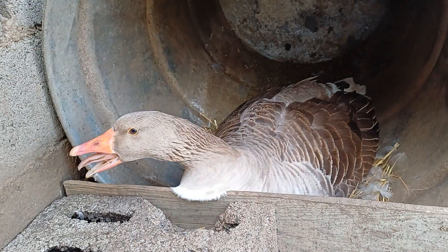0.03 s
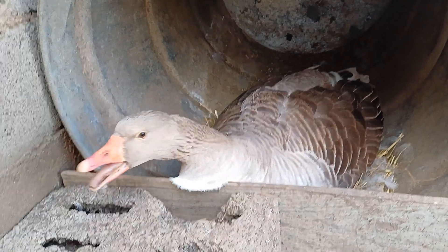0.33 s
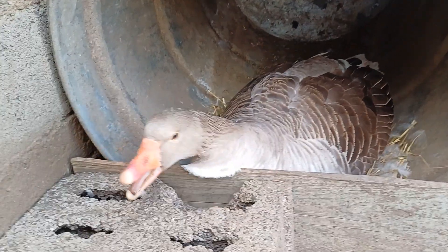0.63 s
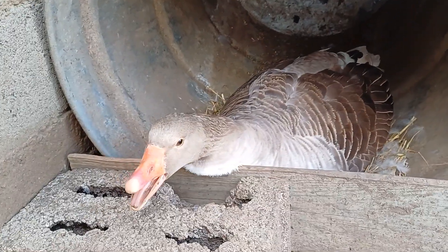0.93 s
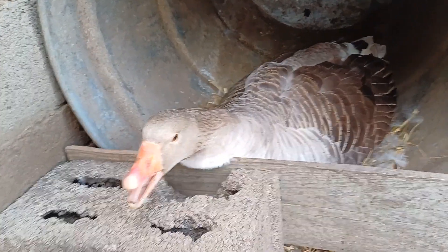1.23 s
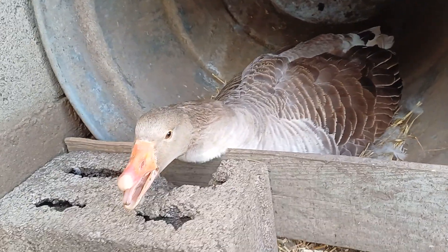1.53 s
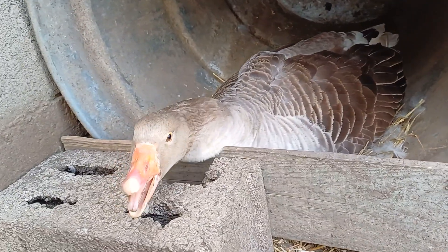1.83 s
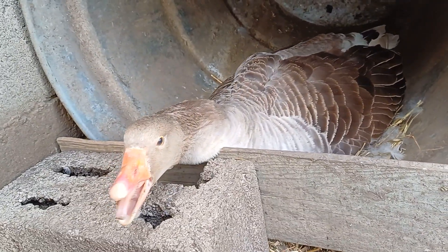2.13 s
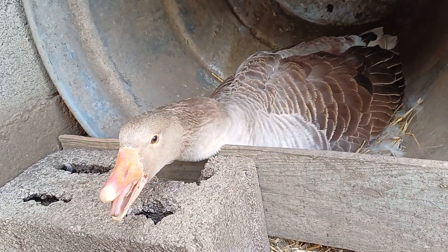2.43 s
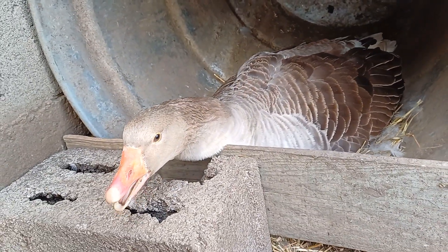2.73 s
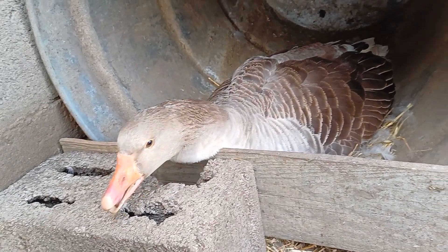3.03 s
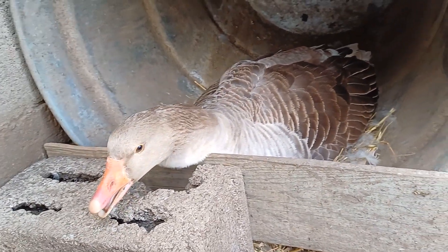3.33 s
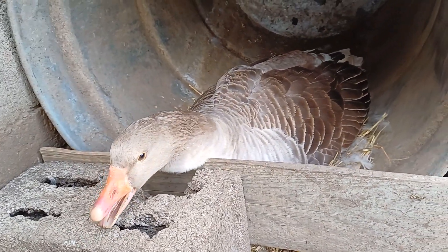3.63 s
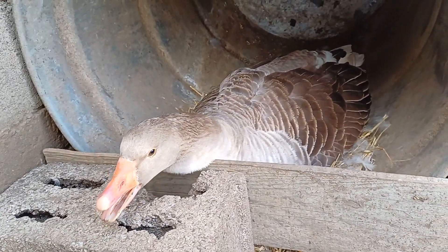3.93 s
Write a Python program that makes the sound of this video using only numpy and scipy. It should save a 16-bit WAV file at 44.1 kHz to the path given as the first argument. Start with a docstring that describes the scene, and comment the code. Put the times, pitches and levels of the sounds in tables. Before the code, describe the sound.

A goose cackles in quick hoarse bursts and hisses twice, long and sharp.

```python
"""Goose in a barrel

A nesting goose cackles in quick hoarse syllables and hisses twice through its open bill.
The syllables are throat pulses in four resonances; the hiss is a jet of air, combed by echoes
off the block under the bill. The barrel rings briefly behind the bird, light wind bumps the
microphone, and a soft low rush rises from the faint yard air between the hisses."""
import sys
import numpy as np
from scipy import signal
from scipy.fft import rfft, irfft
from scipy.io import wavfile
from scipy.ndimage import uniform_filter1d, map_coordinates

SR = 44100
rng = np.random.default_rng(int(sys.argv[2]) if len(sys.argv) > 2 else 0)


def wav_out(sig):
    """Save sig, one row per channel (or a flat mono array), as 16-bit PCM at SR to the path in sys.argv[1]."""
    wavfile.write(sys.argv[1], SR, np.round(np.clip(np.atleast_2d(sig).T, -1, 1) * 32767).astype(np.int16))


N = 176400


def undb(db):
    """Decibels to gain."""
    return 10 ** (np.asarray(db) / 20)


def unit(x):
    """Scale to rms 1."""
    return x / np.sqrt(np.mean(x ** 2) + 1e-20)


def curve(rows):
    """Join (seconds, value) points by straight lines."""
    return np.interp(np.arange(N) / SR, *np.array(rows).T)


def colour(x, points):
    """Filter by (Hz, dB) points."""
    hz, db = np.array(points).T
    bins_hz = np.fft.rfftfreq(x.shape[-1], 1 / SR)
    return irfft(rfft(x) * undb(np.interp(np.log(bins_hz + 1), np.log(hz), db)), x.shape[-1])


def noise(spectrum, shape=N):
    """Coloured noise at rms 1."""
    return unit(colour(rng.standard_normal(shape), spectrum))


def resonate(x, hz, width_hz):
    """Steep resonance at rms 1: one band-pass applied twice."""
    b, a = signal.iirpeak(hz, hz / (width_hz * np.pi / 2), SR)
    return unit(signal.lfilter(b, a, signal.lfilter(b, a, x)))


def wander(rate_hz):
    """Smooth random motion at rms 1."""
    hold = int(SR / rate_hz)
    steps = np.repeat(rng.standard_normal(N // hold + 1), hold)
    return unit(uniform_filter1d(steps, hold)[:N])


def delay(x, ms):
    """Fixed or moving delay."""
    return map_coordinates(x, [np.arange(N) - ms * SR / 1000], order=2, mode="mirror")


def pan(left_over_right_db):
    """Left and right gains."""
    return undb(np.array([[left_over_right_db], [-left_over_right_db]]) / 2)


# Outdoor air. Each row: frequency in Hz, gain in dB.
YARD_SPECTRUM = [(30, 8), (130, 7.5), (350, -7), (900, -12), (2000, -5), (3100, -25), (4500, -5.5),
                 (5700, -8.5), (7000, -8.5), (8500, -34.5), (11000, -21.5), (15500, -25)]


def yard(level_db=-70.5):
    """Faint outdoor air, drifting slowly in level."""
    return noise(YARD_SPECTRUM, (2, N)) * undb(level_db + wander(1.2))


# Wind bumps. Each row: centre in seconds, length in seconds, level in dB, left over right in dB.
WIND_BUMPS = [(0, 0.068, -48.5, -18), (.125, 0.03, -44.5, -25), (.17, 0.023, -30, -6.5),
              (.224, 0.026, -27, -1), (.37, 0.034, -31.5, 1), (.43, 0.032, -28, -4), (.68, 0.2, -46, -3),
              (.91, 0.024, -44.5, -2), (1.42, 0.085, -43, -4), (2.3, 0.21, -54, -4.5),
              (2.885, 0.021, -47.5, -16), (3.075, 0.042, -45.5, -4.5), (3.262, 0.046, -43, -1)]
# Eddies. Each row: frequency in Hz, gain in dB.
WIND_SPECTRUM = [(20, -22.5), (45, 4), (70, 1), (120, 1), (200, -10), (320, -15.5), (600, -31), (1500, -71),
                 (16000, -100)]


def wind():
    """Short low bumps of air on the microphone, partly shared by both ports."""
    t, out = np.arange(N) / SR, np.zeros((2, N))
    eddies = unit(colour(rng.standard_normal((2, N)) + rng.standard_normal(N), WIND_SPECTRUM))
    for centre_s, length_s, db, pan_db in WIND_BUMPS:
        envelope = np.exp(-np.minimum(2 * ((t - centre_s) / length_s) ** 2, 20))
        bump = eddies * envelope
        norm = np.sqrt(2 * np.sum(envelope ** 2) / np.sum(bump ** 2))
        out += undb(db) * pan(pan_db) * bump * norm
    return out


def windpipe(x, bounces_ms=(.75, 1.15, 1.9), gain=.55):
    """Reflections along the windpipe spread each pulse without colouring it."""
    for ms in bounces_ms:
        taps = np.r_[-gain, np.zeros(int(ms * SR / 1000)), 1]
        x = signal.lfilter(taps, taps[::-1], x)
    return x


def throat_pulses(phase, rough, jitter_cycles=.018, shimmer_db=4):
    """One pulse a cycle; roughness scatters timing and strength."""
    cycles = np.arange(1, int(phase[-1]))
    timing, strength = rng.standard_normal((2, len(cycles)))
    places = np.interp(cycles + jitter_cycles * rough ** 2 * timing, phase, np.arange(len(phase)))
    pulses = np.zeros(len(phase))
    pulses[np.round(places).astype(int)] = undb(shimmer_db * rough * strength)
    return unit(pulses)


# Broad rasp of the throat. Each row: frequency in Hz, gain in dB.
RASP_SPECTRUM = [(400, -35.5), (600, 11), (1800, -17), (3500, 0.5), (4200, 6), (4600, -4.5), (5100, 1.5),
                 (6300, -4.5), (8000, -20), (12000, -21), (16000, -23.5)]
SAG_HZ_PER_S, ARCH_HZ = 90, 7
CHEST_HZ, CHEST_DB = 197, -10
RELEASE_S, TAIL_S, TAIL_DB = .024, .03, -14


def syllable(t, length_s, attack_s, pitch_hz, rough,
             low_hz, low_db, mid_hz, mid_db, high_hz, high_db, top_hz, top_db):
    """Pulses and puffs of air ring the throat; the upper resonances open at the loud middle, t = 0."""
    hz = pitch_hz - SAG_HZ_PER_S * t - ARCH_HZ * np.minimum((2 * t / length_s) ** 2, 2)
    phase = np.cumsum(hz) / SR
    pulses = throat_pulses(phase, rough)
    puffs = unit(rng.standard_normal(len(t)) * np.exp(-(phase % 1) / .96))
    throat = windpipe(pulses + .35 * rough * puffs)

    outside_s = np.abs(t) - length_s / 2
    edge = np.clip(outside_s / np.where(t < 0, attack_s, RELEASE_S), -1, 1)
    tail = undb(TAIL_DB) * np.exp(-np.maximum(outside_s, 0) / TAIL_S) * (t > 0)
    swell = np.maximum(.5 - .5 * np.sin(np.pi / 2 * edge), tail)

    chest = undb(CHEST_DB) * resonate(throat, CHEST_HZ, width_hz=91)
    rasp = unit(colour(throat + .12 * puffs, RASP_SPECTRUM))
    low = undb(low_db) * (resonate(throat, low_hz, width_hz=340) + chest)
    mid = undb(mid_db) * resonate(throat, mid_hz, width_hz=320)
    high = undb(high_db) * resonate(throat, high_hz, width_hz=320)
    top = undb(top_db) * (resonate(throat, top_hz, width_hz=420) + rasp)
    return swell * (low - mid) + swell ** 2.2 * (high + top)


# Goose syllables. Each row: centre in seconds, length in seconds, attack in seconds, pitch in Hz,
# roughness 0-1, then four resonances, low to high, each as frequency in Hz and relative level in dB.
SYLLABLES = [ (.073,0.041,0.012,208.3,0.37,904,-32.5,1400,-65,2320,-43,5030,-47.5),
             (0.17,0.07,0.047,203.8,0.76,830,-37,1530,-47,2830,-40.5,4440,-48),
             (.278,0.075,0.034,201.3,0.62,796,-37.5,1490,-43,2865,-36.5,4250,-46),
             (0.378,0.089,0.027,201.8,0.53,830,-38,1520,-38,2860,-37,4670,-47.5),
             (0.476,0.069,0.016,204.5,0.53,1250,-31.5,2120,-43,3070,-38,4800,-42),
             (.572,0.065,0.034,199.8,0.78,880,-34.5,1500,-37,2600,-37.5,3170,-39.5),
             (0.681,0.069,0.049,199.8,0.73,870,-35.5,1530,-41,2670,-33.5,3540,-41),
             (0.809,0.041,0.024,187.6,1,940,-40.5,1370,-47.5,2620,-42,5800,-43.5),
             (.909,0.046,0.028,185.8,0.92,1010,-36.5,1460,-46.5,2590,-33.5,5800,-36),
             (1.016,0.037,0.011,181.2,1,940,-37,1370,-48,2340,-39.5,3850,-47),
             (1.423,0.058,0.017,176.2,0.62,985,-39,1440,-46,2310,-36.5,3840,-46.5),
             (1.507,0.058,0.017,178.9,0.7,1200,-32.5,1760,-33.5,2300,-32,2790,-35),
             (2.039,0.058,0.02,179.6,1,1210,-35.5,1670,-34.5,2450,-33,2840,-32.5),
             (2.136,0.083,0.036,180.5,0.6,1190,-33,1620,-30,2540,-25,2980,-32.5),
             (2.221,0.09,0.022,182,0.61,1400,-30,1740,-31.5,2560,-26.5,3010,-34),
             (2.318,0.059,0.024,180.2,0.48,1250,-30,1750,-35,2580,-29,3010,-40.5),
             (2.758,0.04,0.0086,209.3,0.89,1040,-44,1107,-60.5,2420,-51,3980,-60),
             (3.263,0.045,0.018,178.7,0.71,1100,-36,1266,-39,2160,-40,2570,-43.5),
             (3.368,0.039,0.0038,181.5,0.73,1070,-51,1294,-50,2520,-50.5,2750,-62.5)]
# Stereo side against mid. Each row: frequency in Hz, gain in dB.
SIDE_SPECTRUM = [(150, -16), (500, -3), (1100, 2), (2300, -3), (5000, -6), (15000, 3.5)]
# Stereo width as the head turns. Each row: time in seconds, side gain in dB.
HEAD_TURN = [(0, 5), (.6, 6.5), (1.5, 2.5), (2.1, 0), (2.7, 2), (3.3, 4)]


def cackle(gain_db=-4, pan_db=-1, barrel_db=-7):
    """The syllables reach the two microphone ports out of phase and ring the barrel."""
    half = SR // 7
    t, padded = np.arange(-half, half) / SR, np.zeros(N + 2 * half)
    for centre_s, *shape in SYLLABLES:
        start = int(centre_s * SR)
        padded[start:start + 2 * half] += syllable(t, *shape)
    voice = padded[half:-half]
    side = colour(signal.hilbert(voice).imag, SIDE_SPECTRUM) * undb(curve(HEAD_TURN))
    ports = np.array([voice + side, voice - side])
    return undb(gain_db) * pan(pan_db) * (ports + undb(barrel_db) * barrel(voice))


# Ring of the barrel. Each row: frequency in Hz, gain in dB.
BARREL_SPECTRUM = [(150, 4.5), (1100, 9), (2500, 4), (6000, 2)]


def barrel(x, t60_s=.17):
    """Dense short ring of the barrel, different on each side."""
    t = np.arange(SR // 4) / SR
    ring = rng.standard_normal((2, len(t))) * np.exp(-np.log(1000) * t / t60_s) * (t > .003)
    ring = colour(ring / np.sqrt(np.sum(ring ** 2) / 2), BARREL_SPECTRUM)
    return signal.fftconvolve(x[None], ring, axes=1)[:, :N]


# Sharp jet and its softer, lower spray. Each row: frequency in Hz, gain in dB.
JET_SPECTRUM = [(5000,-43),(8000,-20.5),(9000,-12),(10000,-4.5),(11400,-2.5),(12600,-2),(14000,-2.5),(15800,-4.5)]
SPRAY_SPECTRUM = [(2800,-23.5),(3300,-15),(4000,-10.5),(4600,-13),(5500,-3.5),(6300,-8.5),(8000,-12),(9500,-13.5),(14000,-17)]
# Swell of jet, spray and hollow mouth. Each row: time in seconds, relative level in dB.
JET_LEVEL = [(0, -78), (.37, -59.5), (.62, -65), (.78, -46), (.95, -33), (1.2, -29.5), (1.5, -24.5),
             (1.93, -23), (2.17, -25.5), (2.42, -29.5), (2.46, -46), (2.51, -81), (3.45, -84), (3.62, -75),
             (3.68, -39), (3.72, -35), (3.84, -27.5), (4, -28)]
SPRAY_LEVEL = [(0,-67),(.66,-62),(.76,-50),(.95,-40.5),(1.3,-40.5),(1.6,-37.5),(2.15,-37),(2.43,-41),(2.51,-74.5),(3.56,-88),(3.7,-54.5),(4,-40)]
MOUTH_LEVEL = [(0, -71.5), (.65, -49), (.95, -47), (1.3, -44.5), (1.6, -44.5), (2, -43), (2.42, -43.5),
               (2.5, -71.5), (2.7, -81.5), (3.5, -89.5), (3.62, -65), (3.72, -50.5), (3.85, -47),
               (4, -45.5)]
# Resonance over the tongue. Each row: time in seconds, frequency in Hz.
TONGUE_GLIDE = [(.75,10300),(1,12500),(1.5,11520),(1.9,11150),(2.45,11160),(3.65,12620),(4,13500)]
# Mouth resonances. Each row: frequency in Hz, width in Hz, relative level in dB.
MOUTH_RESONANCES = [(163, 127, -2), (933, 310, -3), (1393, 117, -0.5), (1897, 240, -0.5), (2357, 380, 3),
                    (2760, 530, -3.5), (3970, 1100, 1.5)]


def airflow(tongue_width_hz=620, tongue_db=-12.5, flicker_db=1.5):
    """A sharp jet over the tongue, its softer spray, and the hollow mouth behind them."""
    lowpass = signal.butter(2, tongue_width_hz / 2, fs=SR)
    band = signal.lfilter(*lowpass, signal.hilbert(rng.standard_normal(N)))
    carrier = np.exp(2j * np.pi * np.cumsum(curve(TONGUE_GLIDE)) / SR)
    tongue = undb(tongue_db) * unit((band * carrier).real)
    jet = (noise(JET_SPECTRUM) + tongue) * undb(curve(JET_LEVEL))
    spray = noise(SPRAY_SPECTRUM) * undb(curve(SPRAY_LEVEL))
    mouth = sum(undb(db + flicker_db * wander(25)) * resonate(rng.standard_normal(N), hz, width_hz)
                for hz, width_hz, db in MOUTH_RESONANCES)
    return jet + spray + unit(mouth) * undb(curve(MOUTH_LEVEL))


# Echoes off the block under the bill. Each row: first delay in ms, delay at full stretch in ms, gain.
BLOCK_ECHOES = [(0.673, 0.856, 0.16), (1.25, 2.1, 0.29), (2.299, 3.307, 0.27)]
STRETCH_S, PORT_LAG_MS = 2.41, .022


def hiss(gain_db=-.5, pan_db=-1, barrel_db=-4):
    """Airflow combed by echoes that lengthen as the head stretches out, plus scatter from the barrel."""
    air = airflow()
    stretch = np.minimum(np.arange(N) / SR / STRETCH_S, 1)
    near = air + sum(gain * delay(air, first_ms + (last_ms - first_ms) * stretch)
                     for first_ms, last_ms, gain in BLOCK_ECHOES)
    ports = np.array([near, delay(near, PORT_LAG_MS)])
    far = undb(barrel_db) * airflow()
    lag = SR // 50
    scatter = np.array([far, np.r_[np.zeros(lag), far[:-lag]]])
    flutter_db = wander(60) + wander(9.9)
    return undb(gain_db + flutter_db) * pan(pan_db) * (ports + scatter)


# Swell of the rush. Each row: time in seconds, level in dB.
RUSH_LEVEL = [(2.6, -71.5), (2.85, -58), (3.09, -56), (3.17, -60), (3.3, -54), (3.5, -66), (3.65, -74)]
# Its colour. Each row: frequency in Hz, gain in dB.
RUSH_SPECTRUM = [(60, 0), (200, -8), (450, -7), (800, -18), (1500, -29), (5000, -64)]


def rush(flicker_db=1.5):
    """Soft low noise that swells between the hisses."""
    return noise(RUSH_SPECTRUM, (2, N)) * undb(curve(RUSH_LEVEL) + flicker_db * wander(35))


def scene():
    """The goose over wind and yard air, in stereo."""
    return yard() + wind() + cackle() + hiss() + rush()


def record(dry):
    """The recorder cuts the top."""
    cutoff_hz = 15800
    return signal.sosfilt(signal.ellip(12, .2, 80, cutoff_hz, fs=SR, output="sos"), dry)


dry = scene()
out = record(dry)
wav_out(out)
```